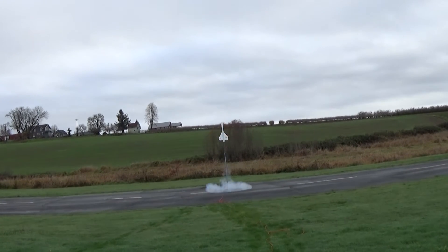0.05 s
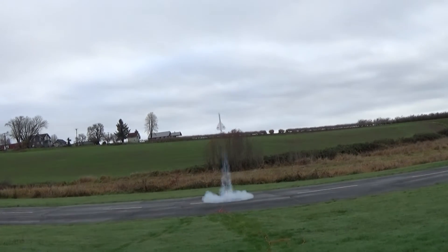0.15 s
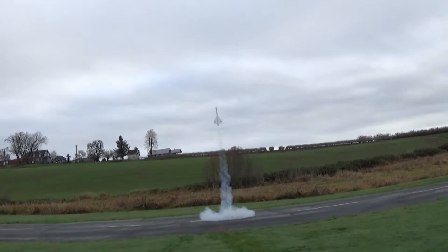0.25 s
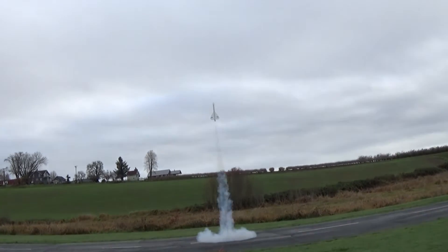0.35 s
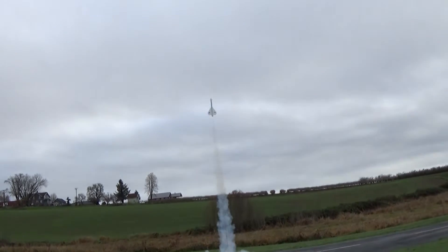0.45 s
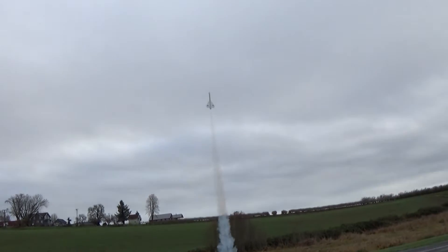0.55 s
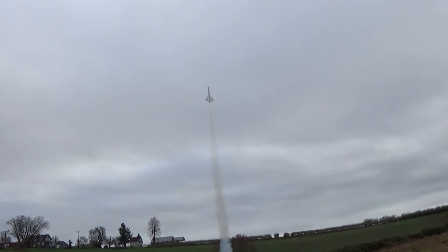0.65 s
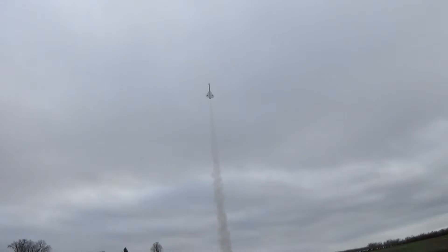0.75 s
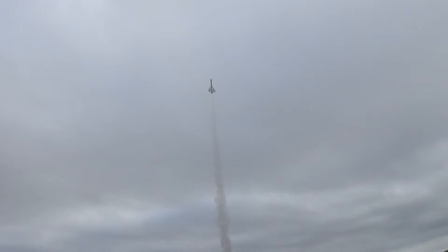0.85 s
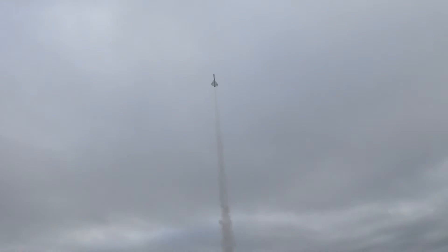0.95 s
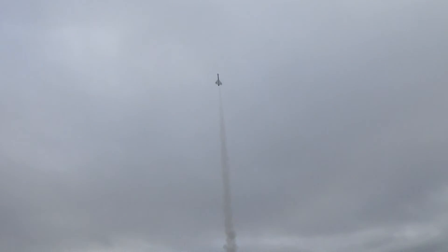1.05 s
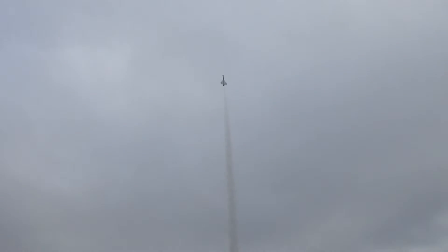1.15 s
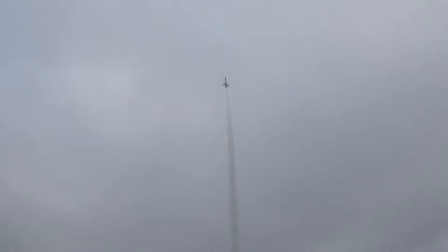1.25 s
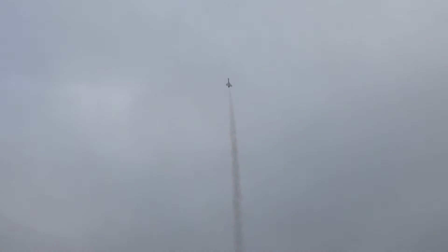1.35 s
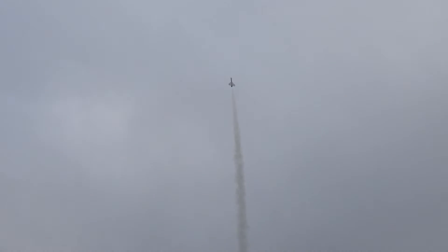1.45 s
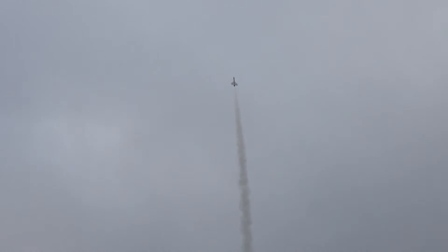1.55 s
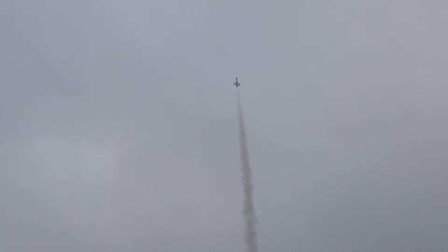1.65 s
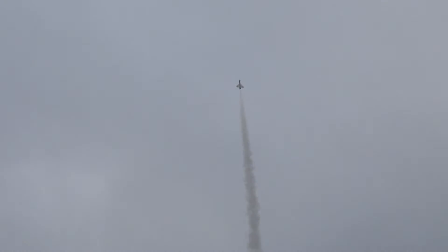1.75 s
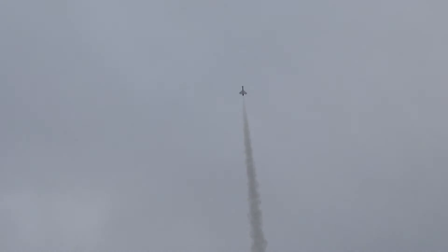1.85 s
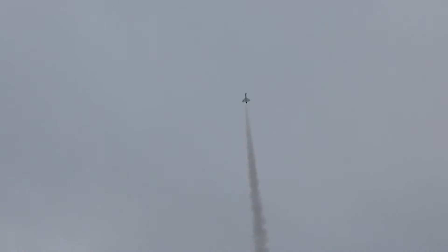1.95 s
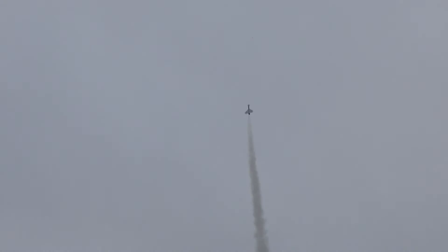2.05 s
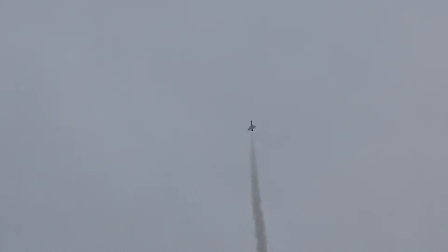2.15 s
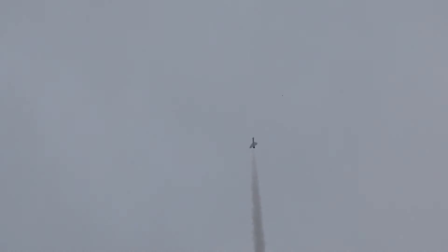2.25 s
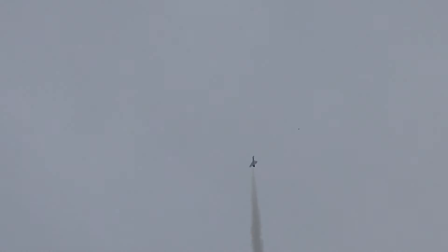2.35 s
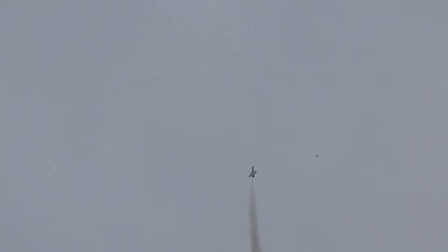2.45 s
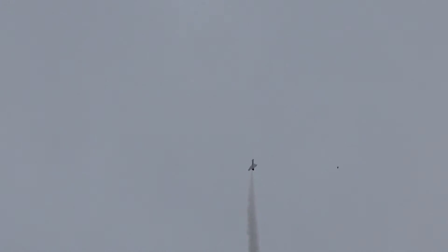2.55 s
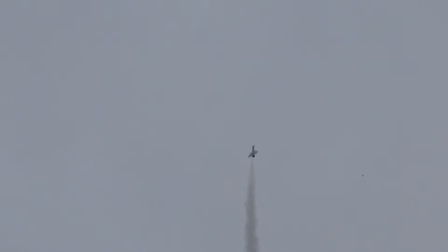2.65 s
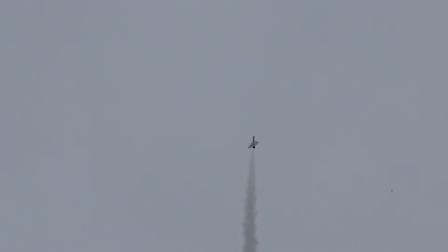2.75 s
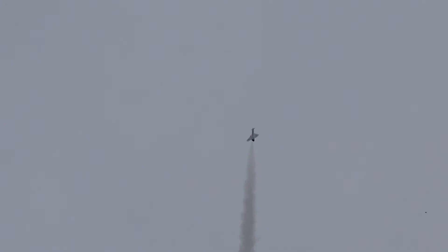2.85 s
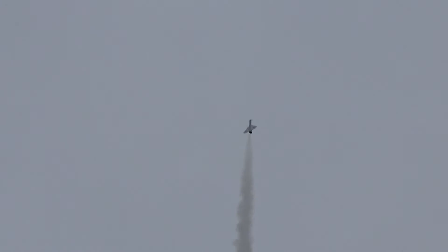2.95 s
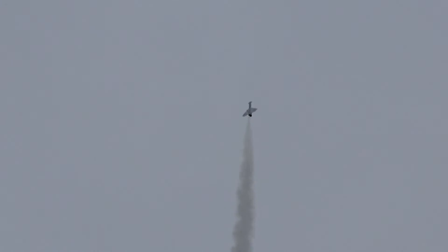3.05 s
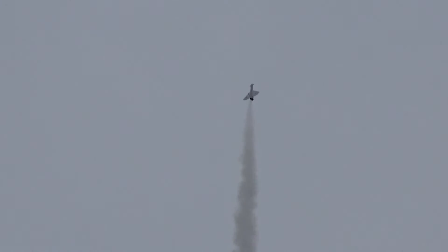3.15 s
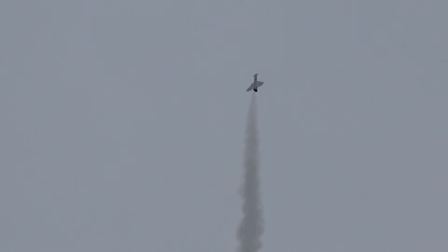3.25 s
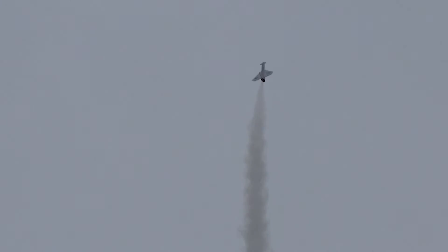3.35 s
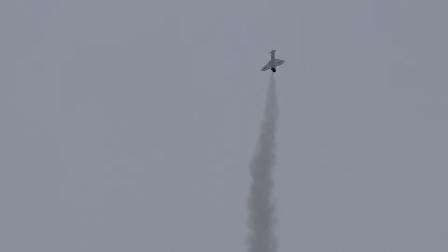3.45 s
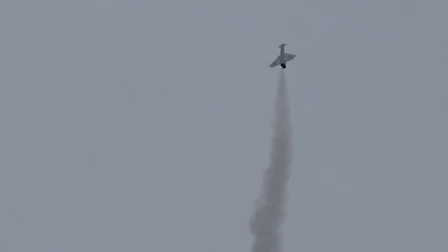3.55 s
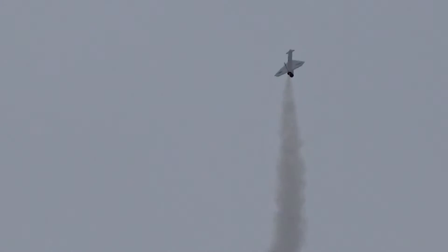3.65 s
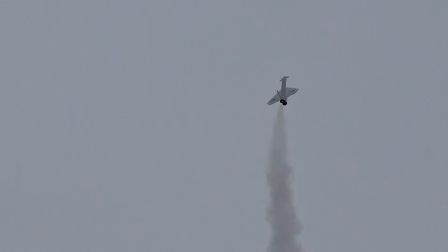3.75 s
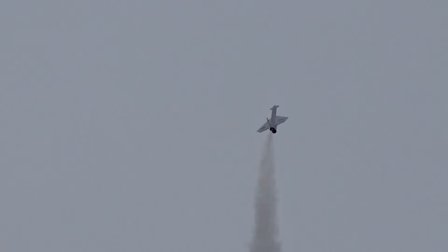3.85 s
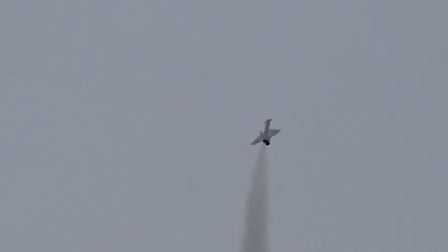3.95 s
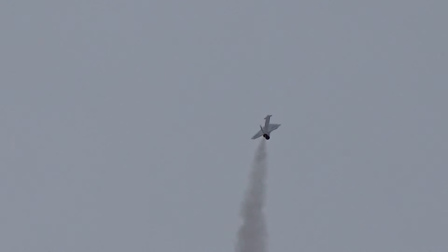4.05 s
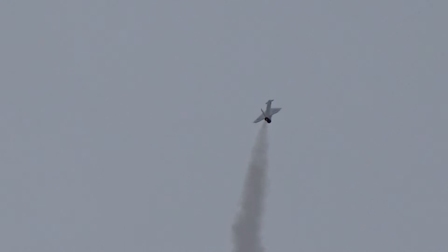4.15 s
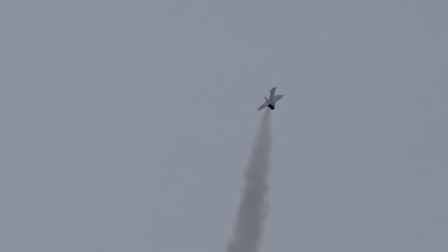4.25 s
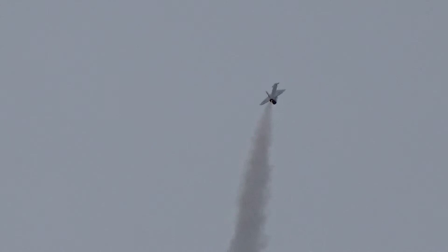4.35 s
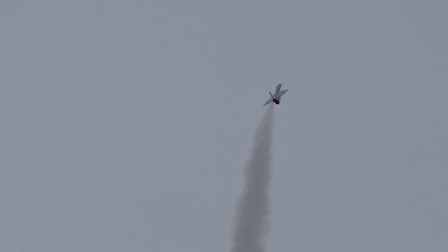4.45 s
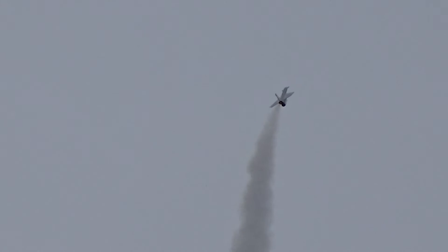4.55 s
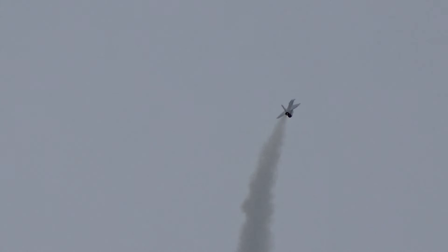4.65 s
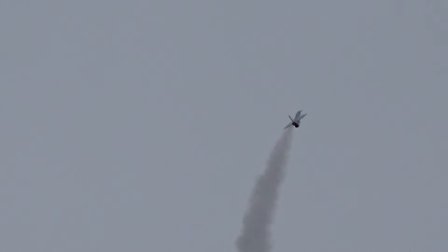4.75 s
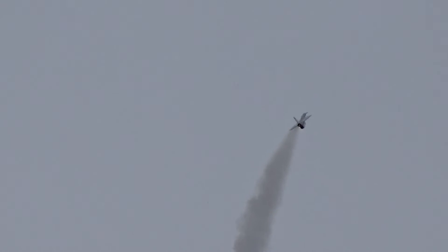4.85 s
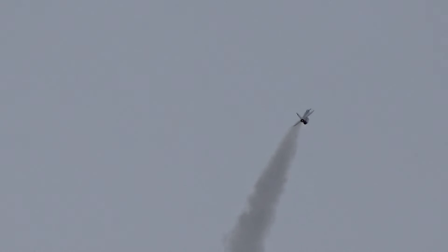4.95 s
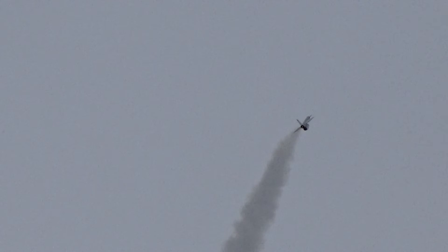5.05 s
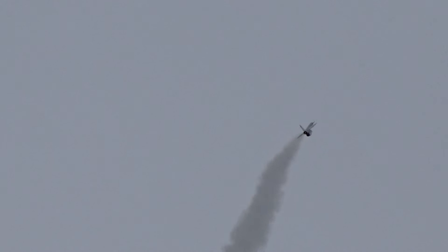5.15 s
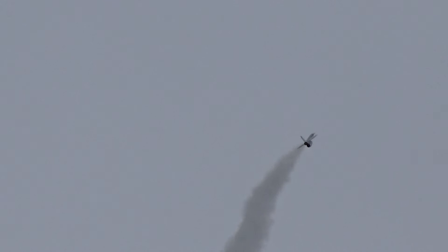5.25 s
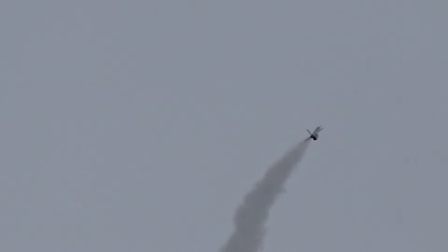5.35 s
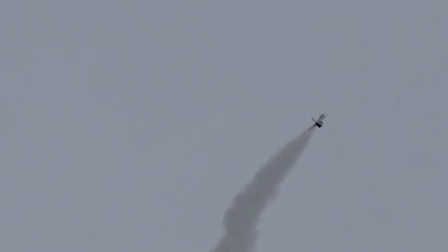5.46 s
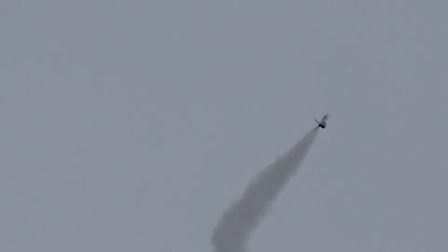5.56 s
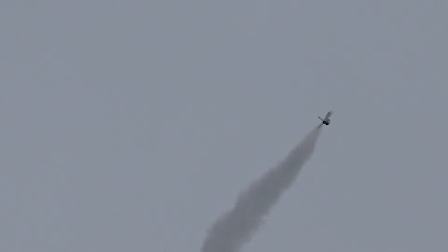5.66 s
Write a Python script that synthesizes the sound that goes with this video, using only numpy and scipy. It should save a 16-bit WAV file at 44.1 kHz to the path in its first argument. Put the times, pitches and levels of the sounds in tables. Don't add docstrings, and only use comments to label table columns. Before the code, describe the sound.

A model rocket is already burning as the sound starts, about twenty metres away on a paved strip in an open field. Its bright, dense hiss has an extra mid-range blast off the pad at first, then climbs away, losing treble while a rough roar and sharp crackling pops build. A hand-held camera with two close microphones hears it nearly centred, with a shifting reflection off the grass.

```python
import sys
import numpy as np
from scipy import signal
from scipy.fft import rfft, irfft, next_fast_len
from scipy.io import wavfile
from scipy.ndimage import uniform_filter1d, map_coordinates

SR = 44100
rng = np.random.default_rng(int(sys.argv[2]) if len(sys.argv) > 2 else 0)


def gain_from_db(level_db):
    decades = np.asarray(level_db, float) / 20
    return 10 ** decades


def digitize_waveform(pressure):
    field = np.atleast_2d(pressure).T
    bounded = np.clip(field, -1, 1)
    quanta = np.round(bounded * 32767).astype(np.int16)
    wavfile.write(sys.argv[1], SR, quanta)


N = 251811
SECONDS = np.arange(N) / SR
EAR_M = 1.547


def unit(x):
    return x / np.sqrt(np.mean(x ** 2) + 1e-20)


def along(points, hz):
    f, v = np.transpose(points)
    return np.interp(np.log(hz + 1), np.log(f + 1), v)


def curves(rows, t):
    s, *cols = np.transpose(rows)
    return [np.interp(t, s, c) for c in cols]


def wobble(rate):
    knots = rng.standard_normal(int(N * rate / SR) + 4)
    return map_coordinates(knots, [np.arange(N) * rate / SR])


def filtered(x, response):
    m = next_fast_len(N + 8192)
    return irfft(rfft(x, m) * response(np.fft.rfftfreq(m, 1 / SR)), m)[..., :N]


def delay(hz, ms):
    return np.exp(-2j * np.pi * hz * ms / 1000)


def climb(t):
    pad_m, start_m, arc_m = 20, 1.09, 76
    start_m_per_s, cruise_m_per_s, gather_s = 4.1, 18.75, .602
    slow_start = (cruise_m_per_s - start_m_per_s) * gather_s * (1 - np.exp(-t / gather_s))
    height = start_m + cruise_m_per_s * t - slow_start
    return np.degrees(np.arctan2(height, pad_m)), np.minimum(np.hypot(height, pad_m), arc_m)


# time [s], jet level [dB].
BURN_LEVEL = [(0, -32.5), (.07, -31), (.3, -31.5), (.6, -31.5), (1.05, -30.5), (1.7, -30), (1.96, -29),
              (2.15, -29), (2.47, -28.5), (2.7, -28.5), (3.25, -27), (3.49, -30), (3.68, -27.5), (4.2, -29),
              (4.5, -33), (4.7, -31), (5.38, -31), (5.71, -29.5)]


def heard(t):
    deg, metres = climb(t)

    def lobe(centre_deg, width_deg):
        return 1 / (1 + np.exp((centre_deg - deg) / width_deg))

    beam_db = 6
    blast_db = 5.5 * np.exp(-t / 0.26)
    mids_db = beam_db * lobe(38.2, 1.6) + blast_db
    level_db = curves(BURN_LEVEL, t)[0] + mids_db
    treble_db = 12 + beam_db - mids_db - 0.2332 * metres
    roar_blast_db = 9.5 * np.exp(-t / 0.41)
    roar_lobe_db = 8 * lobe(44.9, 3.9)
    roar_db = -53 + roar_blast_db + roar_lobe_db + 0.0518 * metres
    return level_db, treble_db, roar_db - level_db


# time [s], change [dB], length [ms].
FALTERS = [(.185, -3, 15), (1.364, -5.5, 13), (2.424, -3, 11), (2.685, -2, 20), (3.333, -2.5, 19),
           (3.472, 1, 14), (3.677, -6, 12), (3.799, 0, 15), (3.893, -3, 20), (3.923, -1.5, 11),
           (4.023, -1.5, 12), (4.545, 1, 12), (4.94, -3, 14), (3.428, 2, 23), (4.331, 4.5, 7.6),
           (4.408, 3.5, 8.9), (4.697, 0.5, 11), (4.732, 0.5, 9), (1.775, 0, 32)]


def burn():
    falter = sum(db * np.exp(-.5 * ((SECONDS - s) / (ms / 3000)) ** 2) for s, db, ms in FALTERS)
    return gain_from_db(falter + 0.2 * wobble(8.8) + 0.37 * wobble(45) + 0.25 * wobble(220))


# frequency [Hz], level [dB per Hz].
JET_COLOUR = [(150, -60), (300, -36.5), (614, -28), (950, -21.5), (1300, -16.5), (2400, -10), (2900, -6.5),
              (4800, -3), (7000, -3), (8200, -0.5), (10200, -1), (12000, -9.5), (13800, -20.5),
              (15700, -29.5)]
# frequency [Hz], share [1].
AIR_SHARE = [(900, -0.096), (2000, -0.24), (3500, -0.088), (6500, 0.52), (10000, 1.117), (15500, 1.89)]
# frequency [Hz], share [1].
ROAR_SHARE = [(200, 0.89), (900, 0.96), (2200, 0.5), (4000, 0)]


def jet(patchy_db, treble_ref_db, roar_ref_db):
    hz, t, z = signal.stft(rng.standard_normal(N), SR, nperseg=256)
    level_db, treble_db, roar_db = heard(t)
    twinkle_db = 0.73 * np.interp(t, SECONDS, wobble(7.6))
    air = np.outer(along(AIR_SHARE, hz), treble_db - treble_ref_db + twinkle_db)
    roar = np.outer(along(ROAR_SHARE, hz), roar_db - roar_ref_db)
    eddies = uniform_filter1d(rng.standard_normal(z.shape), size=9, axis=0)
    eddies = uniform_filter1d(eddies, size=14, axis=1)
    gain = gain_from_db(level_db + air + roar + patchy_db * unit(eddies))
    rush = signal.istft(z * gain, SR, nperseg=256)[1][:N]
    return filtered(rush, lambda f: gain_from_db(along(JET_COLOUR, f)))


# time [s], peak [dB], sharpness [0-1].
BIG_POPS = [(0.4096, -9, 1.0), (1.3606, -8.9, 1.0), (1.7847, -8, 0.0), (1.8866, -9, 0.4),
            (2.4188, -5.3, 0.5), (2.7333, -12.6, 0.0), (2.8797, -5.9, 0.7), (2.9712, -10.9, 0.1),
            (3.3285, -5.6, 0.9), (3.3533, -8.8, 0.3), (3.4131, -7.5, 0.5), (3.4269, -5.5, 0.4),
            (3.4688, -5.6, 0.6), (3.6714, -4.5, 0.5), (3.8185, -6.6, 0.7), (3.8811, -5.3, 0.8),
            (3.888, -5.4, 0.8), (4.058, -6.6, 0.6), (4.2633, -6.6, 0.7), (4.3315, -5.4, 0.3),
            (4.4072, -5, 0.5), (4.4667, -8.1, 0.1), (4.5562, -5.5, 0.2), (4.6939, -9.0, 0.1),
            (4.7317, -6, 0.1), (4.7333, -8, 0.2), (5.0612, -6.7, 0.8), (5.1193, -6.5, 0.7),
            (4.4107, -8.5, 0.4), (5.684, -5.8, 0.6)]
# frequency [Hz], level [dB].
SHOCK_COLOUR = [(200, -38), (600, -16), (1500, -5), (3200, 0), (6000, -5), (9000, -19), (15000, -45)]


def small_shocks(small_db, spread_db, most_db):
    spikes = np.zeros((2, N))
    when, size, sharp = rng.random((3, 1200))
    level_db, _, roar_db = heard(when * N / SR)
    size_db = np.minimum(-spread_db * np.log(size + 1e-4), most_db)
    place = ((sharp > .5) * 1, (when * N).astype(int))
    np.add.at(spikes, place, gain_from_db(level_db + roar_db + small_db + size_db))
    return spikes


def stray_pops():
    count, size_db, scatter_db = 66, -11, 4
    late = rng.triangular(0, 3.8 * SR / N, 1, count)
    odds, keen = rng.random((count, 2)).T
    edge = np.minimum(1.5 - late - .3 * keen, 1)
    return [late * (N - 1) / SR, size_db + scatter_db * (2 * odds - 1), edge]


def crackle(small_db, spread_db, most_db, puff_db, puff_ms):
    spikes = small_shocks(small_db, spread_db, most_db)
    pops = np.zeros((2, N))
    s, db, edge = np.hstack([np.transpose(BIG_POPS), stray_pops()])
    pops[:, np.round(s * SR).astype(int)] = gain_from_db(db) * np.array([1 - edge, edge])
    bell = np.exp(-.5 * (np.arange(-600, 601) / (puff_ms * SR / 1000)) ** 2)
    swell = signal.fftconvolve(pops, bell[None], "same")
    puffs = gain_from_db(puff_db) * swell * rng.standard_normal((2, N))

    def dull_and_sharp(f):
        return gain_from_db([along(SHOCK_COLOUR, f * 1.15), along(SHOCK_COLOUR, f * .7)])

    return filtered(spikes + gain_from_db([[16.5], [12]]) * pops + puffs, dull_and_sharp).sum(axis=0)


# frequency [Hz], level [dB].
GRASS_COLOUR = [(300, -5), (900, -8), (1600, -10), (2500, -13), (4000, -15), (6000, -17), (10000, -27)]


def ground(x):
    elevation = np.radians(climb(SECONDS)[0])
    lag_ms = 2000 * EAR_M / 343 * np.sin(elevation)
    grazing = np.exp(-lag_ms / 2.5)
    soft = filtered(x, lambda f: gain_from_db(along(GRASS_COLOUR, f)))
    shifted = filtered(soft, lambda f: -1j * (f > 0))
    turn = .2 + 1.6 * grazing
    strength = gain_from_db(2 * grazing ** 2 + 2 * wobble(9))
    turned = strength * (np.cos(turn) * soft + np.sin(turn) * shifted)
    lag_ms = lag_ms + .025 * wobble(7)
    return x + map_coordinates(turned, [np.arange(N) - lag_ms * SR / 1000], mode="mirror")


def apron(x):
    echo = filtered(x, lambda f: delay(f, 1.07) / (1 + (f / 2000) ** 4))
    return x + gain_from_db(-7) * np.exp(-(SECONDS / .25) ** 4) * echo


# delay [ms], level [dB].
BODY_ECHOES = [(1., -21), (1.45, -19), (1.7, -22)]


def holder(x):
    def response(f):
        echo = sum(gain_from_db(db) * delay(f, ms) for ms, db in BODY_ECHOES)
        return 1 + echo / (1 + (f / 7000) ** 4)

    return filtered(x, response)


# frequency [Hz], left over right [dB].
PORT_TILT = [(60, 0.0), (110, 0.0), (200, 0.0), (380, 0.0), (700, -0.19), (1290, 1), (2380, -1.0),
             (4400, -1.7), (8120, -0.14), (15000, -1.1)]
# frequency [Hz], left lead [radians].
PORT_TURN = [(0, 0.071), (1460, -0.28), (2410, -0.36), (2670, -0.097), (4570, 0.1), (5940, -0.0),
             (15200, 0.0)]


def microphones(x):
    def ports(f):
        tilt = gain_from_db(np.outer([.5, -.5], along(PORT_TILT, f)))
        turn = np.exp(1j * np.outer([.5, -.5], along(PORT_TURN, f)))
        return tilt * turn * f ** 4 / (f ** 4 + 120 ** 4)

    return filtered(x, ports)


# frequency [Hz], level [dB].
SCATTER_COLOUR = [(100, -18), (500, -22), (1400, -21), (3000, -17.5), (4800, -20), (6000, -30),
                  (9000, -25.5), (12000, -39)]


def scattered(flame):
    diffuse = gain_from_db(12.0) * flame * jet(patchy_db=4.0, treble_ref_db=4.5, roar_ref_db=-17.0)
    return np.outer([1, -1], filtered(diffuse, lambda f: gain_from_db(along(SCATTER_COLOUR, f))))


# time [s], pitch [Hz], level [dB].
ENGINE_LINE = [(0, 129, -96), (2.7, 131, -94), (3, 133.4, -78), (3.9, 139.4, -79), (4.6, 145.4, -73),
               (5.71, 155, -73)]
# time [s], pitch [Hz], level [dB].
LOW_ENGINE_LINE = [(0, 92, -100), (4.3, 93, -96), (4.6, 94, -80), (5.71, 98, -79)]


def far_engine():
    hz, db = curves(ENGINE_LINE, SECONDS)
    level = gain_from_db(db + 2.0 + .3 * wobble(2))
    drone = level * np.sin(2 * np.pi * np.cumsum(hz + .5 * wobble(4.2)) / SR)
    hz, db = curves(LOW_ENGINE_LINE, SECONDS)
    hum = gain_from_db(db + 1.0) * np.sin(2 * np.pi * np.cumsum(hz + .6 * wobble(4)) / SR)
    return drone + hum


# frequency [Hz], level [dB per Hz].
RUMBLE_COLOUR = [(20, -14), (60, -2), (100, -0.5), (200, -1), (350, -2.5), (800, -35)]
# time [s], level [dB].
RUMBLE_GAIN = [(0, -74), (2.5, -75), (4, -77), (5.71, -67)]


def rumble():
    noise = rng.standard_normal((2, N))
    shared, own = unit(filtered(noise, lambda f: gain_from_db(along(RUMBLE_COLOUR, f))))
    gusts_db = 2.6 * wobble(4) + 3.8 * wobble(14)
    level = gain_from_db(curves(RUMBLE_GAIN, SECONDS)[0] - 2 + gusts_db)
    return level * (shared + gain_from_db(-12) * np.outer([1, -1], own))


def scene():
    flame = burn()
    hiss = gain_from_db(11.5) * flame * jet(patchy_db=0.48, treble_ref_db=1.5, roar_ref_db=-20.0)
    shocks = crackle(small_db=30.5, spread_db=3.5, most_db=9, puff_db=-14, puff_ms=2.2)
    rocket = holder(apron(ground(hiss + shocks)))
    return microphones(rocket) + scattered(flame) + far_engine() + rumble()


# frequency [Hz], level against the frame [dB].
SIDE_LIMIT = [(100, -63.5), (500, -49), (1000, -41), (1600, -40.5), (3000, -37.5), (9000, -38)]
# frequency [Hz], level [dB].
TOP_LIMIT = [(13000, -92), (14000, -70), (15000, -66), (15600, -60)]


def faint_bands_dropped(pair, count=16):
    middle_side = np.array([pair[0] + pair[1], pair[0] - pair[1]]) / 2
    hz, _, z = signal.stft(middle_side, SR, nperseg=2048)
    power = np.abs(z[:, :-1] ** 2)
    mid, side = power.reshape(2, -1, count, z.shape[2]).sum(axis=2)
    edges = hz[:-1:count, None]
    swing_db = 3 * rng.standard_normal(z.shape[2])
    mid_kept = mid > gain_from_db(2 * (along(TOP_LIMIT, edges) + swing_db))
    side_kept = side > gain_from_db(2 * along(SIDE_LIMIT, edges)) * mid.sum(axis=0)
    kept = np.array([mid_kept, side_kept])
    band = np.minimum(np.arange(len(hz)) // count, len(edges) - 1)
    mid, side = signal.istft(z * kept[:, band], nperseg=2048)[1][:, :N]
    return np.array([mid + side, mid - side])


def low_pass(x):
    return signal.sosfilt(signal.butter(12, 15660, fs=SR, output="sos"), x)


def record(dry):
    excess = dry - dry / (1 + np.abs(dry / .72) ** 4) ** .25
    held = dry - filtered(excess, lambda f: f ** 2 / (f ** 2 + 120 ** 2))
    mix = faint_bands_dropped(held)
    return low_pass(mix)


dry = scene()
out = record(dry)
digitize_waveform(out)
```